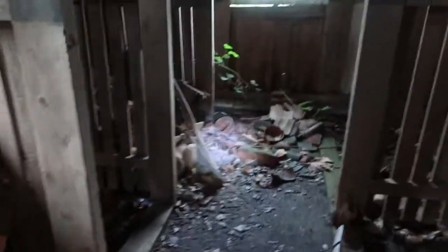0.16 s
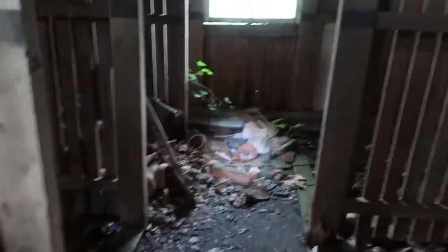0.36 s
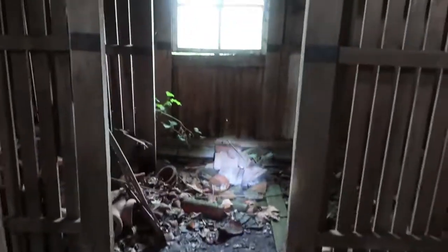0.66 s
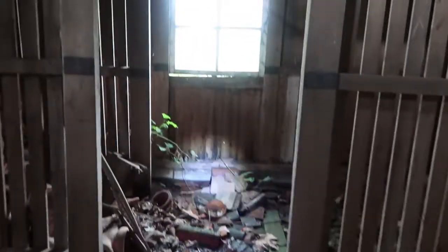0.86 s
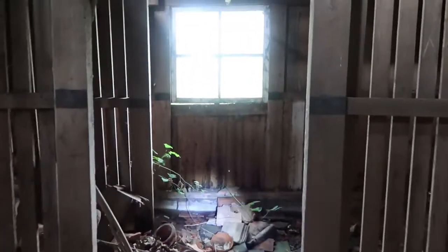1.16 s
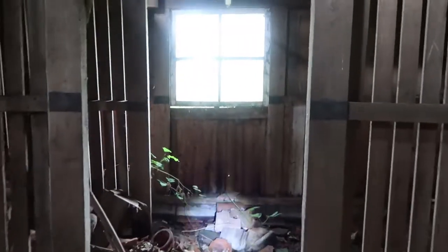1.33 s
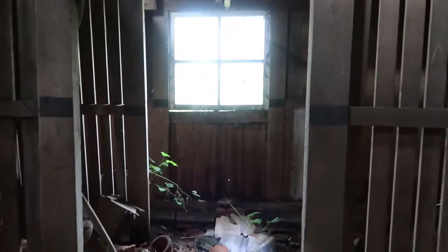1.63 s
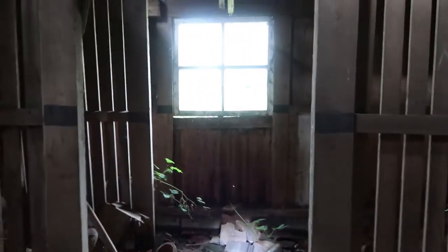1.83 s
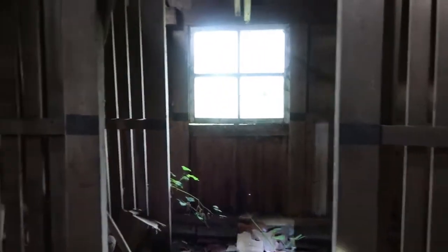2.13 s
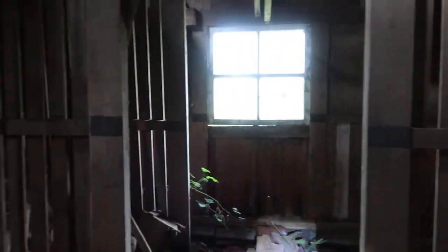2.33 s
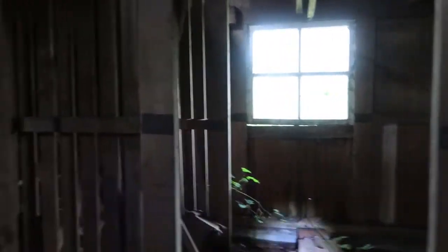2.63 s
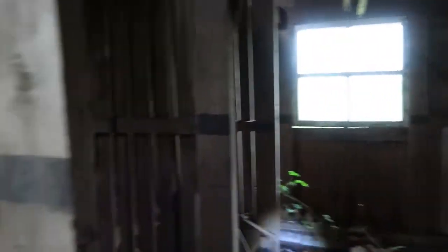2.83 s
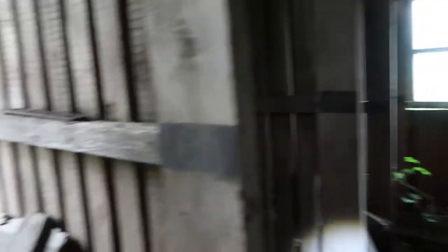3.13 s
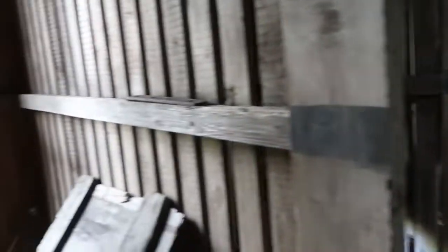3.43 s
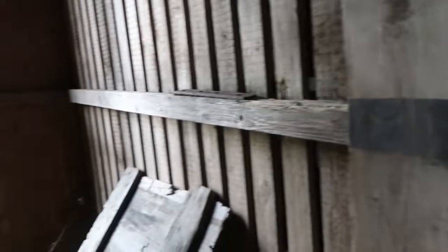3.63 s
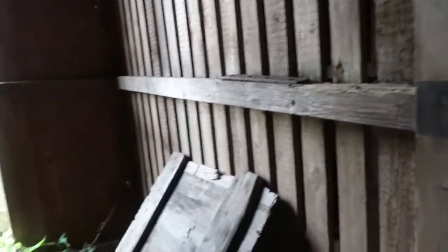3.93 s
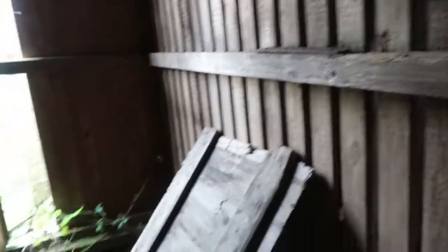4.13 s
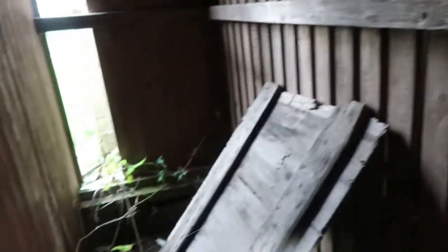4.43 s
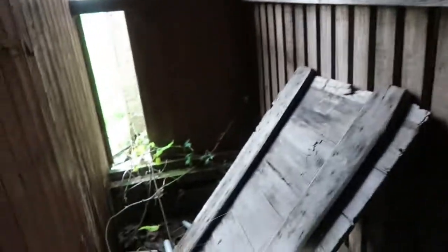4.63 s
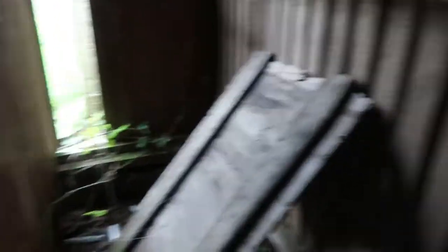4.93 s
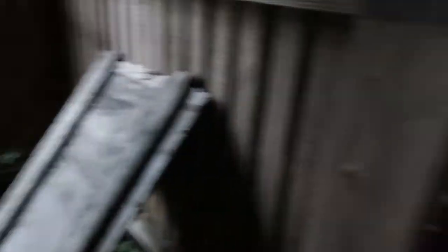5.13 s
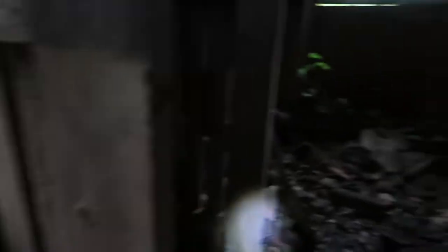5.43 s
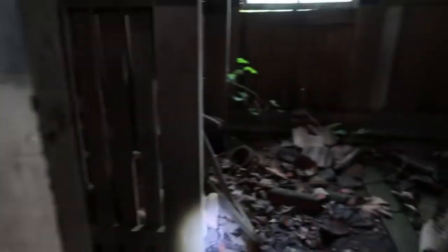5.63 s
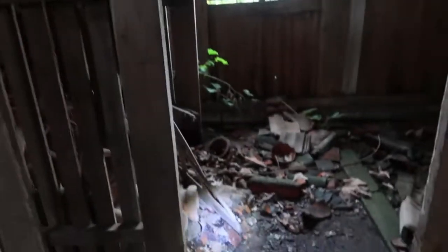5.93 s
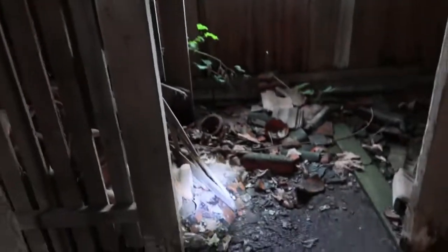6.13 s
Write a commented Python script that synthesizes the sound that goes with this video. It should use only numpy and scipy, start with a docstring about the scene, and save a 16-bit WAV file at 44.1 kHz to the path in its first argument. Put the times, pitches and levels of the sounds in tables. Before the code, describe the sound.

Hollow wooden knocks and gritty crunching as someone shifts on loose planks in a derelict shed, then quiet air and a few lone steps.

```python
"""Someone shifts and steps on a gritty plank floor in a derelict wooden building.
Boards knock and creak: each slip is a choked sine with a noise crack; low decaying sines thump along.
Grit crunches as filtered random clicks, some in bursts of high treble; stones and pebbles ring as short sines.
The planks ring on, a wall throws treble back, and a short noise tail makes the room.
Later come lone steps and a thin squeak; faint calls and a low wash of outdoor air are filtered noise."""
import sys
import numpy as np
from scipy import signal
from scipy.fft import rfft, irfft
from scipy.io import wavfile
from scipy.ndimage import uniform_filter1d

SR = 44100
rng = np.random.default_rng(int(sys.argv[2]) if len(sys.argv) > 2 else 0)


def transcribe(u):
    """Save the signal u as a 16-bit wav file named by the first command-line argument.

    u: samples, shape (n,) or (channels, n), limited to [-1, 1]; the rate is SR.
    q: integer samples, one column per channel.
    """
    v = np.clip(np.atleast_2d(u).T, -1, 1)
    q = np.round(v * 32767).astype(np.int16)
    wavfile.write(sys.argv[1], SR, q)


N = 276066  # length in samples


def amp(db):
    """Turns decibels into a gain."""
    return 10 ** (np.asarray(db) / 20)


def evened(x):
    """Scales a signal to an rms level of 1."""
    return x / np.sqrt(np.mean(x ** 2) + 1e-20)


def read(points, hz):
    """Reads values off a table along a log-frequency axis."""
    f, value = np.transpose(points)
    return np.interp(np.log(hz + 1), np.log(f + 1), value)


def add(mix, s, sound):
    """Mixes a sound in from time s, in seconds."""
    part = mix[..., max(round(s * SR), 0):][..., :sound.shape[-1]]
    part += sound[..., :part.shape[-1]]


def colour(x, points, tilt_db=0, size=4096):
    """Filters with the table's spectrum, tilted by some dB an octave, and never sounds ahead of its input."""
    hz = np.abs(np.fft.fftfreq(size, 1 / SR))
    gain_db = read(points, hz) + tilt_db * np.log2(1 + hz / 1000)
    log_gain = np.log(amp(gain_db))
    # the Hilbert transform supplies the phase that puts the energy earliest
    spectrum = np.exp(np.conj(signal.hilbert(log_gain)))
    taps = np.fft.ifft(spectrum).real[:size // 2]
    return np.apply_along_axis(lambda v: signal.fftconvolve(v, taps)[:len(v)], -1, x)


def low_passed(x, hz):
    """Keeps only what changes slowly, below hz."""
    return signal.sosfilt(signal.butter(2, hz, fs=SR, output="sos"), x)


def slow_noise(size, hz):
    """Random wandering slower than hz, at rms 1."""
    return evened(low_passed(rng.standard_normal(size), hz))


def whistle(hz, width_hz):
    """Noise in one narrow resonance that follows the pitch curve hz."""
    fuzz = low_passed(rng.standard_normal((2, len(hz))), width_hz / 2)
    turn = np.exp(2j * np.pi * np.cumsum(hz) / SR)
    return evened(((fuzz[0] + 1j * fuzz[1]) * turn).real)


def murmur(x, patch_db=1.0, patch_s=.09, patch_hz=260, centre_hz=1400, octaves=0.76):
    """The middle of the wash swells and thins in small patches of time and pitch."""
    hz, t, z = signal.stft(x, SR, nperseg=1024)
    patches = uniform_filter1d(rng.standard_normal(z.shape), max(round(patch_hz / hz[1]), 1), 0)
    patches = evened(uniform_filter1d(patches, max(round(patch_s / t[1]), 1), 1))
    reach = np.exp(-(np.log2((hz[:, None] + 1) / centre_hz) / octaves) ** 2)
    return signal.istft(z * amp(patch_db * reach * patches), SR, nperseg=1024)[1][:N]


# how loud the wash of air is over time: t/s, level/dB
AIR_LOUDNESS = [(0, -40), (.5, -51), (.8, -44.5), (1.0, -57), (1.6, -50), (2.05, -45.5), (2.4, -45.5),
                (2.95, -43), (3.5, -41.5), (4.3, -40), (4.85, -43), (5.3, -39.5), (6.26, -41)]
# tone of the wash: f/Hz, relative level per hertz/dB
AIR_TONE = [(15, -28), (25, -10.5), (54, -0.5), (122, -5), (344, -13), (372, -13), (403, -12), (472, -17),
            (649, -19), (1020, -20.5), (1650, -26.5), (2250, -30.5), (3830, -38), (4480, -38.5),
            (12600, -56), (14000, -69)]
# stereo spread of the wash: f/Hz, side against mid level/dB
AIR_SPREAD = [(60, -53), (110, -28.5), (200, -17.5), (370, -11), (670, -11), (1230, -9.5), (2260, -4.5),
              (4130, -0.5), (7560, 0.5), (13800, 4)]


def air(whine_hz=13020, whine_db=-39, roll_db=2.0, roll_hz=7, below_hz=450):
    """Noise as a low outdoor wash with lumpy bass and a faint electronic whine, along a set level curve."""
    mid, side = evened(colour(rng.standard_normal((2, N)), AIR_TONE, size=8192))
    bass = signal.sosfiltfilt(signal.butter(2, below_hz, fs=SR, output="sos"), mid)
    roll = evened(amp(roll_db * slow_noise(N, roll_hz)))
    mid = murmur(mid) + bass * (roll - 1)
    t = np.arange(N) / SR
    whine = amp(whine_db) * np.sin(2 * np.pi * whine_hz * t)  # level against the wash
    loudness = amp(np.interp(t, *np.transpose(AIR_LOUDNESS)))
    return loudness * np.array([mid + whine, colour(side, AIR_SPREAD)])


def grains(size, per_s, spread_db):
    """Random clicks of widely differing strength, as mid and side."""
    happens = rng.random(size) < per_s / SR
    strength = amp(spread_db * np.minimum(rng.exponential(1, size), 4)) * happens
    return strength * rng.choice([-1., 1.], (2, size))


def shards(x, ring_db=1, width_hz=150, low_hz=700, high_hz=5200, drift=0.091, count=7):
    """Fragments pinned under the sole colour the crunch with resonances that slide as they roll."""
    out, r = x.copy(), np.exp(-np.pi * width_hz / SR)
    for k, (place, glide) in enumerate(rng.random((count, 2))):
        start_hz = low_hz * (high_hz / low_hz) ** ((k + place) / count)
        hz = start_hz * np.geomspace(1, np.exp(drift * (2 * glide - 1)), x.shape[-1])
        turn = np.exp(2j * np.pi * np.cumsum(hz) / SR)
        # shift the resonance down to zero, smooth there, and shift back
        out += amp(ring_db) * 2 * (turn * signal.lfilter([1 - r], [1, -r], x / turn)).real
    return evened(out)


def ping(hz, cycles):
    """A chip of stone rings for a few cycles, swelling over the first."""
    turns = hz * np.arange(1000) / SR
    swell = np.sin(np.pi / 2 * np.minimum(turns, 1)) ** 2
    return np.sin(2 * np.pi * turns) * np.exp(-turns / cycles) * swell


def pebbles(per_s=14, spread_db=4, cycles=7, fall_db=-8, count=24):
    """Pebbles of many sizes tick against each other at random; small ones are higher and weaker."""
    out = np.zeros((2, N))
    for hz in np.geomspace(1300, 9000, count):
        tick = amp(fall_db * np.log2(hz / 1000)) * ping(hz, cycles)  # fall_db is per octave
        out += signal.oaconvolve(grains(N, per_s, spread_db), tick[None], axes=1)[:, :N]
    return evened(out)


# soles scuffing on grit: t/s, length/s, rise/s, crunch level/dB, crunch tilt/dB per octave, rub level/dB
SOLE_SCUFFS = [(0.0, 0.11, 0.00035, -37.5, 0, -28), (0.094, 0.093, 0.013, -32.5, 1.5, -22),
               (0.207, 0.084, .004, -52, 3.5, -42), (0.306, 0.032, 0.01, -40, -1, -37.5),
               (0.574, 0.033, 0.001, -43.5, 2.5, -31.5), (0.717, 0.012, .002, -54, 1, -51),
               (0.815, 0.026, 0.00088, -39, -1.5, -33.5), (0.886, 0.048, 0.0011, -40.5, -2.5, -36.5),
               (0.939, 0.0058, 0.00056, -35, 2, -15), (0.973, 0.12, 0.0056, -42.5, -2, -33),
               (1.023, 0.13, 0.0058, -39, 0, -26.5), (1.166, 0.041, 0.0018, -35, -1.5, -25),
               (1.222, 0.016, 0.00364, -36, -0.5, -18), (1.261, 0.088, 0.003, -42.5, 0.5, -30),
               (1.346, 0.083, 0.002, -45, -2, -40), (1.442, 0.019, 0.00062, -44.5, 1, -30.5),
               (1.648, 0.059, 0.0013, -35.5, -1.5, -25), (1.729, 0.037, 0.0024, -38, -4, -29),
               (2.146, 0.032, .0005, -37.5, -2, -28), (2.176, 0.03, .001, -33.5, -3, -25.5),
               (2.218, 0.018, 0.00094, -32, -2.5, -24), (2.291, 0.03, 0.0015, -30, -4.5, -19.5),
               (2.514, 0.051, 0.0013, -35.5, -0.5, -25.5), (2.643, 0.016, 0.00087, -40, 1.5, -30),
               (2.664, 0.024, 0.0026, -36, 0.5, -26), (2.733, 0.022, .003, -38, -2.5, -31.5),
               (2.859, 0.016, 0.0025, -42, -3, -41), (3.14, 0.022, 0.0041, -49.5, 4.5, -49.5),
               (4.581, 0.024, 0.0034, -43.5, -8, -40.5), (4.733, 0.0073, 0.00083, -35.5, 0, -25.5),
               (4.747, 0.0045, 0.00082, -38.5, -4, -30), (5.383, 0.017, 0.0021, -47, 3.5, -50),
               (5.409, 0.025, 0.00079, -50, -3, -27), (5.578, 0.031, 0.0021, -45, -4, -30.5),
               (5.604, 0.033, 0.0059, -42, -5, -33), (5.654, 0.048, .008, -47, -9, -39)]
# tone of the hollow rub: f/Hz, relative level/dB
RUB_TONE = [(100, -67), (200, -23.5), (300, -5.5), (470, 3.5), (780, -2), (1100, -7.5), (1800, -18.5),
            (3200, -29), (8000, -64)]
# tone of the crunch: f/Hz, relative level/dB
CRUNCH_TONE = [(300, -16), (800, 0), (1500, -3), (2800, -1), (4000, -9), (5500, -9.5), (8000, -15.5),
               (11000, -25), (14000, -37)]


def scuffs(release=0.023, pebble_db=-6, clump_db=1.0, clump_hz=90):
    """Grit breaks in clumps: bright crunch, ticking pebbles, and a hollow rub as the board takes up the clicks."""
    out, ticks = np.zeros((2, N)), pebbles()
    t = np.arange(SR // 3) / SR
    for s, length, attack, crunch_db, tilt_db, rub_db in SOLE_SCUFFS:
        clumps = evened(amp(clump_db * slow_noise(len(t), clump_hz)))
        fade = np.exp(-np.maximum(t - length, 0) / release)  # release in seconds
        pressure = (1 - np.exp(-t / attack)) * fade * clumps
        rub = evened(colour(grains(len(t), per_s=800, spread_db=2.5), RUB_TONE))
        crunch = shards(colour(grains(len(t), per_s=1700, spread_db=1.5), CRUNCH_TONE, tilt_db))
        crunch += amp(pebble_db) * ticks[:, max(round(s * SR), 0):][:, :len(t)]
        add(out, s, pressure * (amp(rub_db) * rub + amp(crunch_db) * crunch))
    return out


# a loose board knocks under the foot: t/s, level/dB, f/Hz, each rebound against the blow before/dB,
# splintery crack against the knock/dB, relative ring length/cycles
BOARD_KNOCKS = [(0.0088, -10.5, 510, -35, -17, 12), (0.0257, -9.5, 520, -32, -8.5, 7.3),
                (0.0417, -9.5, 520, -37, -16, 14), (0.0633, -7.5, 510, -32, -18, 19),
                (0.083, -6, 504, -23.5, -17, 13), (0.0987, -4.5, 506, -27, -11, 11),
                (0.1137, -7.5, 462, -22, -9, 11), (0.129, -3.5, 536, -18, -11, 7),
                (0.1361, -6.5, 490, -23, -10, 13), (0.1915, 2.5, 555, -25, -7.5, 8),
                (0.1967, -2.5, 550, -29.5, -12, 7.9), (0.5759, -14, 477, -19, -13, 5.8),
                (0.5835, -12.5, 542, -3, -15, 10), (0.8204, -7, 516, -25, -18, 5),
                (0.8885, -18.5, 670, -8, -1, 7.8), (0.9188, -8.5, 570, -27, -7, 5.2),
                (0.9437, 4, 572, -16, -14.5, 9.2), (0.9585, -8, 580, -21, -14, 11),
                (1.0265, -16.5, 565, -2, -16, 11), (1.0745, -14, 530, -7, -19, 13),
                (1.1, -17, 560, -12, -15, 7.2), (1.122, -18.5, 500, -9, -10, 6.6),
                (1.1725, -6.5, 713, -14, -13.5, 10.3), (1.2002, -15, 620, -16, -17, 6),
                (1.2114, -6.5, 717, -7, -20, 10.5), (1.2305, -10, 694, -22, -21, 6.7),
                (1.2338, -5, 700, -20, -16, 7.2), (1.2425, -7, 690, -18, -12, 7.2),
                (1.2878, -16, 556, -20, -19, 8), (1.318, -4, 623, -26, -13, 4.9),
                (1.3551, -13.5, 500, -24, -18, 9), (1.4005, -15, 470, -29, -11, 13),
                (1.4414, -13.5, 468, -33, -9.5, 13), (1.6502, -11, 495, -30, -24, 13),
                (1.6635, -5, 683, -26, -10.5, 8.5), (1.698, -12.5, 477, -15, -22, 13),
                (1.736, -11.5, 506, -16, -24, 12), (2.1487, -10.5, 487, -26, -10, 11.4),
                (2.1786, -10.5, 485, -27, -12, 7.1), (2.1915, -10.5, 510, -5, -15, 7.6),
                (2.22, -6, 520, -11, -16, 8.5), (2.293, -10, 565, -11, -19, 8.3),
                (2.3069, -5.5, 503, -9.5, -26, 4.3), (2.36, -16, 570, -21, -19, 6.1),
                (2.517, -7.5, 585, -24, -11.5, 9.6), (2.5418, 0, 683, -28, -23, 8.1),
                (2.561, -21, 696, -13, -16, 9.6), (2.6420, -12.5, 546, -22, -12, 9.1),
                (2.6674, -7, 725, -23, -15, 8.4), (2.7345, -16.5, 660, -14, -9, 13),
                (4.5775, -20.5, 1276, -22, -3, 6.7), (4.7383, -10.5, 580, -20, -13, 5.8),
                (4.7488, -17.5, 730, -12, -23, 15), (4.7735, -16.5, 730, -9, -18, 8.3),
                (5.409, -10, 576, -8, -33, 10), (5.4236, -17.5, 523, -6, -26, 8)]
# a board creaks in a run of slips as the weight shifts:
# t/s, length/s, slips per second, first level/dB, last level/dB, f/Hz
BOARD_CREAKS = [(0.1431, 0.031, 150, -13.5, -13.5, 495), (1.091, 0.078, 62, -31, -34, 586)]
SLIP_JITTER_S, SLIP_SPREAD_DB, SLIP_CRACK_DB, SLIP_CYCLES = 0.00019, -5, -7, 32
REBOUND_S, REBOUND_SHRINK = .0076, 0.777  # the board chatters ever faster on its joist


def slips():
    """Lists every blow to the boards: knocks with two rebounds each, and the uneven slips of each creak."""
    delays = np.cumsum([0, REBOUND_S, REBOUND_S * REBOUND_SHRINK])
    blows = []  # t/s, level/dB, f/Hz, crack/dB, ring/cycles
    for s, db, hz, rebound_db, crack_db, cycles in BOARD_KNOCKS:
        for k, delay in enumerate(delays):
            blows.append((s + delay, db + k * rebound_db, hz, crack_db, cycles))
    for start, length, per_s, first_db, last_db, hz in BOARD_CREAKS:
        for s in np.arange(0, length, 1 / per_s):
            late, louder = rng.standard_normal(2)
            db = first_db + (last_db - first_db) * s / length + SLIP_SPREAD_DB * louder
            blows.append((start + s + SLIP_JITTER_S * late, db, hz, SLIP_CRACK_DB, SLIP_CYCLES))
    return blows


# tone of the splintery crack: f/Hz, relative level/dB
CRACK_TONE = [(200, -28), (600, 16), (1500, 5), (2800, -4), (4200, -22), (8000, -41), (14000, -59)]


def boards(rise=0.00054, sag=0.2, sag_s=0.0006, crack_s=0.0027, crack_rise_s=0.00049, low_hz=230,
           hold=1.216, choke=1.37):
    """Each slip kicks a plank into heavy cycles that the foot soon chokes, with a short splintery crack on top."""
    t, out, blows = np.arange(3000) / SR, np.zeros(N), slips()
    splinters = colour(rng.standard_normal((len(blows), len(t))), CRACK_TONE)
    for (s, db, hz, crack_db, cycles), noise in zip(blows, splinters):
        choked = np.exp(-(np.log(1000) * t * hz / (cycles * hold)) ** choke)
        swell = (1 - np.exp(-(t / rise) ** 2)) * choked  # rise in seconds
        turns = hz * (t + sag * sag_s * (1 - np.exp(-t / sag_s)))  # the stiff first swing is the quickest
        knock = swell / swell.max() * np.sin(2 * np.pi * turns)
        crack = amp(crack_db) * evened(noise) * np.exp(-t / crack_s) * (1 - np.exp(-t / crack_rise_s))
        add(out, s, amp(db) * (crack - knock))
    return signal.sosfilt(signal.butter(1, low_hz, "high", fs=SR, output="sos"), out)


# lasting tones of the planks: f/Hz, relative level/dB, time to fall by 60 dB/s
PLANK_MODES = [(248, -37, 0.38), (284, -19.5, 0.2), (343, -18, 0.099), (425.6, -15.5, 0.066),
               (457, -27.5, 0.36), (505, -38.5, 0.56), (627, -52, 0.26), (661, -47.5, 0.41),
               (764, -24.5, 0.21), (845, -31, 0.26), (1008, -41, .35), (1113, -34, 0.6), (1410, -38, .35),
               (1740, -31, 0.43)]


def planks(x, ring_db=-31):
    """The struck floor rings on faintly, each of its own tones dying at its own pace."""
    t = np.arange(SR // 2) / SR
    ring = sum(amp(db - 60 * t / t60) * np.cos(2 * np.pi * hz * t) for hz, db, t60 in PLANK_MODES)
    return amp(ring_db) * signal.fftconvolve(x, ring)[:N]


def wall_echo(x, delay_s=.011, echo_db=-3, above_hz=3500):
    """The wall in front throws the treble straight back after a short delay."""
    out = np.zeros(N)
    treble = signal.sosfilt(signal.butter(1, above_hz, "high", fs=SR, output="sos"), x)
    add(out, delay_s, amp(echo_db) * treble)
    return out


# tone of the room's answer: f/Hz, relative level/dB
ROOM_TONE = [(60, -32), (170, -5), (255, 7.5), (330, 4.5), (450, -3), (750, 1.5), (1500, 0.5), (4000, -1),
             (14000, -3.5)]
# how long the room's tail lasts: f/Hz, time to fall by 60 dB without the early answer/s
ROOM_DECAY = [(250, 0.58), (660, 0.47), (1740, 0.43), (4590, 0.33), (12000, 0.32)]


def room(x, wet_db=-4, gap=0.0051, early_db=7, early_s=0.029, pivot_hz=750):
    """Near plank walls answer the treble at once while the bass builds up; then a short diffuse tail."""
    count = SR // 32
    taps = np.zeros((2, count * 16))  # mid and side
    at = np.arange(count) * 16 + rng.integers(0, 16, (2, count))  # one echo somewhere in every 16 samples
    np.put_along_axis(taps, at, rng.choice([-1., 1.], at.shape), 1)
    hz, t, z = signal.stft(taps, SR, nperseg=256)
    early = early_db * np.exp(-t / early_s) * np.tanh(2 * np.log((hz[:, None] + 1) / pivot_hz))
    decay = -60 * t / read(ROOM_DECAY, hz)[:, None]
    tail = signal.istft(z * amp(early + decay), SR, nperseg=256)[1]
    tail = tail * (np.arange(tail.shape[1]) / SR > gap)  # silent for the first gap seconds
    tail = colour(tail / np.linalg.norm(tail[0]), ROOM_TONE)
    return amp(wet_db) * signal.fftconvolve(x[None], tail, axes=1)[:, :N]


LATE_S = 4.0  # from here on the lone steps sound with more room


def blended_room(x, turn_s=0.3472, count=6, late_db=2.0):
    """The room answer blends steadily through several random tails, and is stronger for the later steps."""
    t = np.arange(N) / SR
    x = x * amp(late_db * (t > LATE_S))
    # how far each tail is from its turn, in units of turn_s
    away = [abs((t / turn_s - k + count / 2) % count - count / 2) for k in range(count)]
    return sum(room(x * np.cos(np.pi / 2 * np.minimum(d, 1))) for d in away)


# single stones snapping: t/s, level/dB, f/Hz, ring decay/cycles
STONE_SNAPS = [(0.0653, -12, 1050, 2.7), (0.101, -24, 1500, 3), (0.1255, -24, 2300, 3),
               (0.179, -21, 1400, 3.3), (0.1828, -23, 2560, 4), (0.1905, -16, 1360, 2.1),
               (0.194, -29, 4950, 7), (0.823, -47, 5070, 6.1), (0.886, -21, 1560, 3),
               (0.8925, -19, 1900, 3.9), (0.9233, -17, 1730, 2.6), (0.9425, -12.5, 1910, 3),
               (0.952, -19, 1174, 3.5), (1.0331, -28, 1050, 3), (1.09, -26, 2080, 3.4),
               (1.103, -25, 1500, 3), (1.1545, -28, 2400, 3), (1.186, -27, 1700, 3),
               (1.2286, -16, 1150, 3.6), (1.246, -23, 1550, 3.3), (1.282, -23, 1170, 3),
               (1.3184, -19, 1270, 5.7), (1.4461, -28, 1230, 2.8), (1.6631, -21, 1150, 3),
               (2.1779, -24, 1470, 1.8), (2.2987, -17.5, 1420, 4.2), (2.3047, -15, 1120, 3.3),
               (2.306, -34, 3230, 9), (2.517, -28.5, 2837, 16), (2.53, -30.5, 6100, 16),
               (2.654, -32, 7200, 6.9), (2.683, -35, 10100, 7.9), (2.8619, -38, 1070, 2.8),
               (4.5772, -26, 2800, 1.1), (4.589, -33, 3460, 3.7), (4.593, -30, 1500, 3.7),
               (4.749, -22.5, 3670, 5.8), (4.747, -22, 5600, 4.3)]


def stones(chip_db=-8, chip_s=0.00038, chip_spread=2.0):
    """A stone snaps with a noise burst of chips around its pitch and a brief ring."""
    t, out = np.arange(1000) / SR, np.zeros(N)
    for s, db, hz, cycles in STONE_SNAPS:
        edges = [hz / chip_spread, min(hz * chip_spread, SR / 3)]
        band = signal.butter(3, edges, "band", fs=SR, output="sos")
        chips = signal.sosfilt(band, rng.standard_normal(len(t)) * np.exp(-t / chip_s))
        add(out, s, amp(db) * (ping(hz, cycles) + amp(chip_db) * chips / abs(chips).max()))
    return out


# low, short thumps along with some knocks: t/s, level/dB, f/Hz, decay/s
LOW_THUMPS = [(0.116, -29.5, 188, 0.0076), (0.137, -32, 194, .007), (0.1925, -27, 147, 0.0077),
              (0.9444, -19, 173, .007), (1.076, -28, 262, 0.0081), (1.125, -29.5, 255, 0.011),
              (1.317, -35, 258, 0.011), (2.306, -31, 293, 0.0046), (4.739, -27.5, 333, 0.0088),
              (5.4087, -29.5, 255, 0.01), (5.675, -25.5, 323, 0.012)]


def thumps():
    """Low, short thumps along with some knocks: each is a sine that dies away within hundredths of a second."""
    t, out = np.arange(SR // 4) / SR, np.zeros(N)
    for s, db, hz, decay_s in LOW_THUMPS:
        add(out, s, amp(db) * np.sin(2 * np.pi * hz * t) * np.exp(-t / decay_s))
    return out


# brief wide bursts of the highest treble in a few scuffs: t/s, level/dB at the sides, decay/s
TREBLE_BURSTS = [(0.184, -45, .01), (0.575, -41, 0.026), (2.528, -46, .01), (2.644, -41, .03),
                 (4.738, -41.5, .02)]
# tone of the bursts: f/Hz, relative level/dB
TREBLE_TONE = [(2000, -35), (6000, -14), (9000, -7), (12500, 1), (14500, -8)]


def treble_bursts(attack_s=.002, mid_db=-14):
    """Brief, wide bursts of the highest treble, made of dense random clicks."""
    t, out = np.arange(SR // 4) / SR, np.zeros((2, N))
    for s, db, decay_s in TREBLE_BURSTS:
        fizz = evened(colour(grains(len(t), per_s=4000, spread_db=2.2), TREBLE_TONE))
        swell = (1 - np.exp(-t / attack_s)) * np.exp(-t / decay_s)
        add(out, s, amp([[db + mid_db], [db]]) * fizz * swell)
    return out


# faint far-off calls, probably birds outside: t/s, length/s, first f/Hz, last f/Hz, level/dB
DISTANT_CALLS = [(0.694, 0.19, 1920, 2050, -58.5), (1.818, 0.22, 1780, 1930, -62),
                 (2.91, 0.17, 1700, 1820, -57.5), (2.985, 0.13, 1930, 2000, -57.5),
                 (3.253, 0.11, 2070, 2110, -55), (3.273, 0.089, 1690, 1740, -56),
                 (3.961, 0.074, 1010, 1050, -50)]


def far_calls(width_hz=165, side_db=-5, waver_hz=30, waver_per_s=14):
    """Soft, wavering whistles that rise, smeared by distance into narrow noise."""
    out = np.zeros((2, N))
    for s, length, first_hz, last_hz, db in DISTANT_CALLS:
        t = np.arange(0, length, 1 / SR)
        waver = waver_hz * np.sin(2 * np.pi * (waver_per_s * t + rng.random()))
        pitch = np.linspace(first_hz, last_hz, len(t)) + waver
        pair = np.array([whistle(pitch, width_hz), amp(side_db) * whistle(pitch, width_hz)])
        add(out, s, amp(db) * signal.windows.tukey(len(pitch), .7) * pair)
    return out


# a thin squeak of a sliding sole or sleeve: t/s, f/Hz, level before judder/dB, lower partial level/dB
THIN_SQUEAK = [(5.48, 9500, -62, -85), (5.499, 9900, -51, -82), (5.513, 10500, -44.5, -76),
               (5.54, 12050, -40, -73), (5.56, 12400, -44, -51), (5.585, 12700, -45, -60),
               (5.61, 12000, -48, -76), (5.66, 12400, -68, -85)]


def squeak(width_hz=650, mid_db=-10.5, rasp_hz=2600, rasp_db=-1.5, lower=0.402, lower_width_hz=450,
           judder_db=3.0, judder_hz=120):
    """Juddering friction in a gliding, mostly rising resonance, with a rasp around it and a lower partial."""
    s, hz, db, lower_db = np.transpose(THIN_SQUEAK)
    t = np.arange(s[0], s[-1], 1 / SR)
    judder = slow_noise(len(t), judder_hz)
    pitch, level = np.interp(t, s, hz), amp(np.interp(t, s, db) + judder_db * judder)
    mid, side = (level * (whistle(pitch, width_hz) + amp(rasp_db) * whistle(pitch, rasp_hz))
                 for _ in range(2))
    partial = amp(np.interp(t, s, lower_db)) * whistle(pitch * lower, lower_width_hz)
    out = np.zeros((2, N))
    add(out, s[0], np.array([amp(mid_db) * mid + partial, side]))
    return out


# stereo spread of the steps and room: f/Hz, gain of the side signal/dB
STEP_SPREAD = [(100, -28), (400, -24), (700, -22), (1230, -13.5), (2260, -11), (4130, -4), (7560, 2.5),
               (13000, 17)]


def scene(knock_side_db=-9, grit_wet_db=-2):
    """Steps in the room over the air; the bass is central and the treble spreads wide."""
    knock, snap, grit = boards() + thumps(), stones(), scuffs()
    near = knock + wall_echo(knock) + snap
    # the two microphone ports differ by a quarter turn of the near sound
    quarter_turn = signal.hilbert(near).imag
    steps = grit + amp([[0], [knock_side_db]]) * np.array([near, quarter_turn])
    steps[0] += planks(knock + grit[0])
    steps += blended_room(knock + snap + amp(grit_wet_db) * grit[0])
    spread = amp(read(STEP_SPREAD, np.fft.rfftfreq(N, 1 / SR)))
    steps[1] = irfft(rfft(steps[1]) * spread, N)
    mid, side = steps + treble_bursts() + squeak() + far_calls() + air()
    return np.array([mid + side, mid - side])  # left and right


EDGE_HZ = 14700  # top of the band


def record(dry):
    """Rounds off the hardest knocks at full scale, then limits the band."""
    rounded = dry / (1 + dry ** 8) ** (1 / 8)
    low_pass = signal.firwin(121, EDGE_HZ, window=("kaiser", 9), fs=SR)
    return signal.oaconvolve(rounded, low_pass[None], "same")


dry = scene()
out = record(dry)
transcribe(out)
```